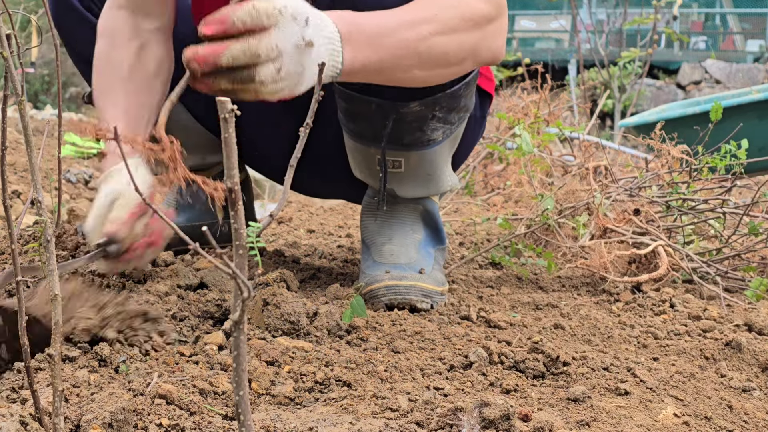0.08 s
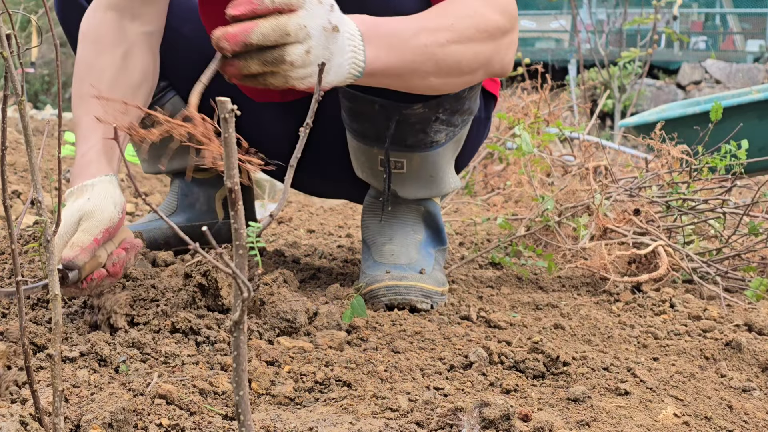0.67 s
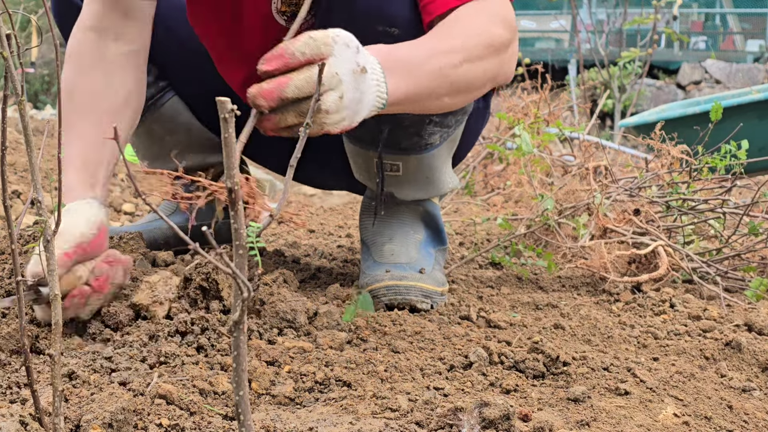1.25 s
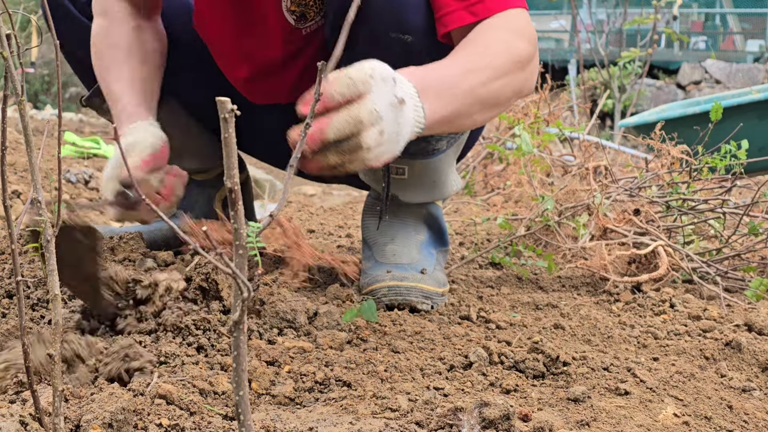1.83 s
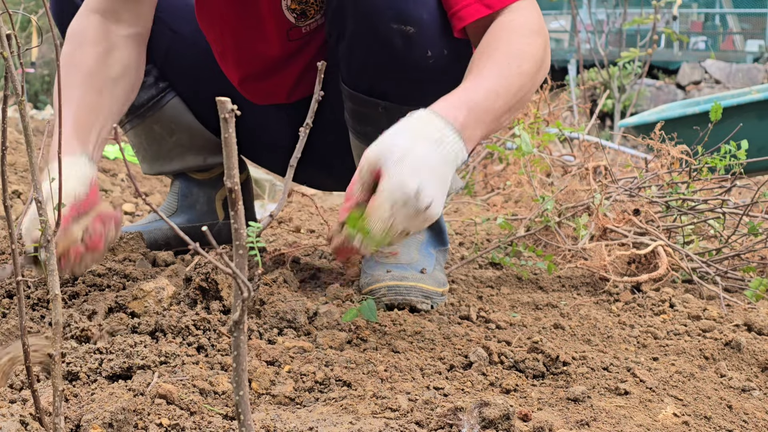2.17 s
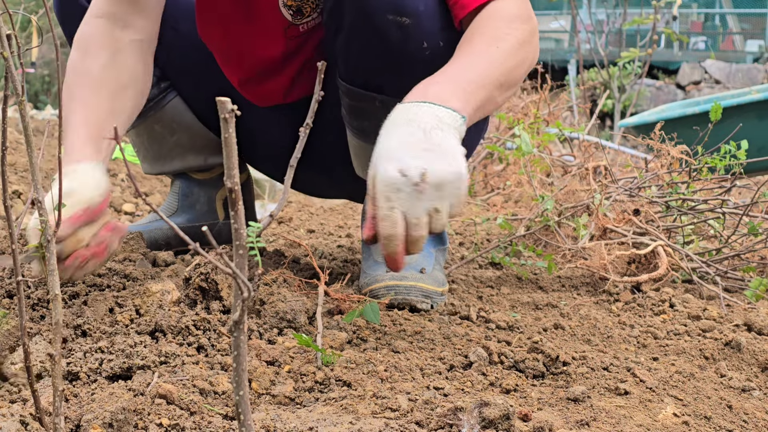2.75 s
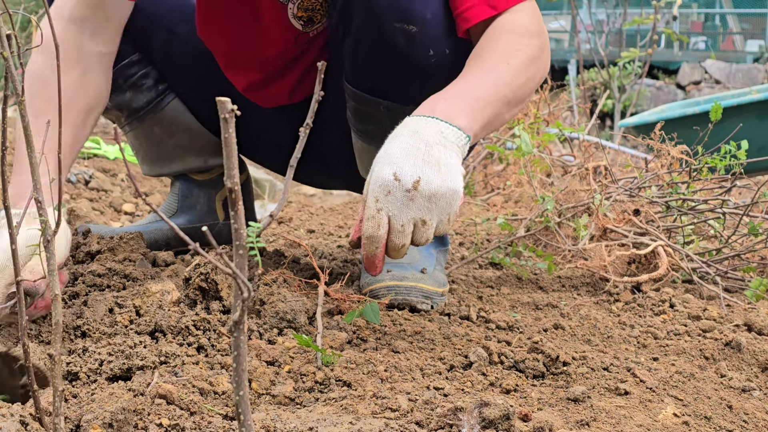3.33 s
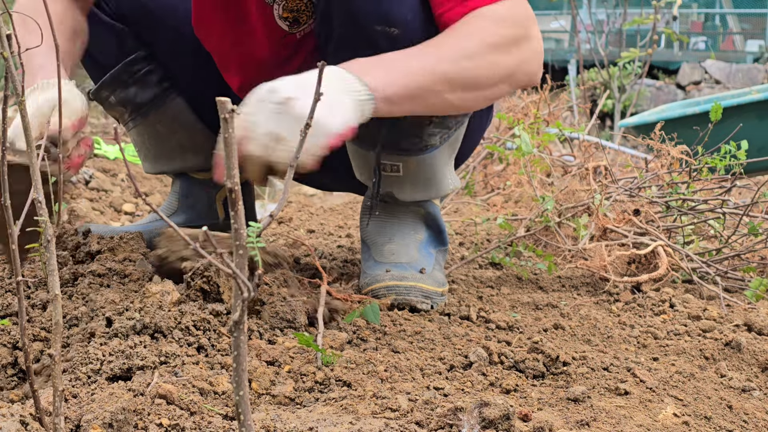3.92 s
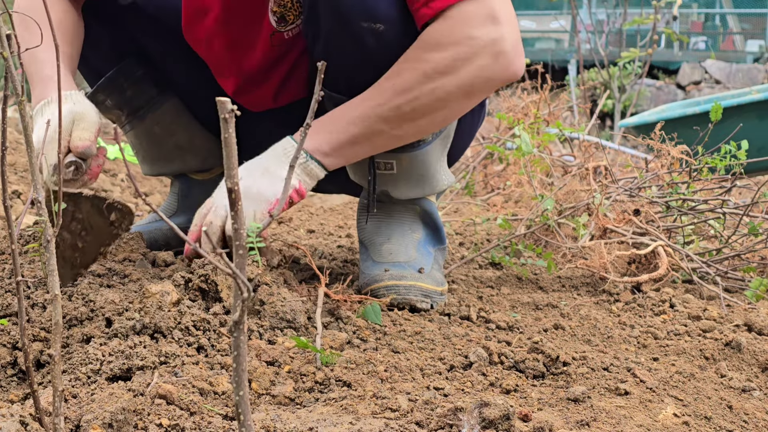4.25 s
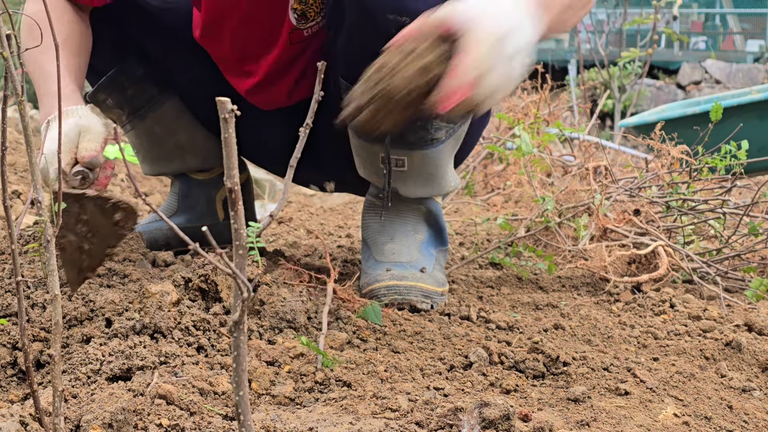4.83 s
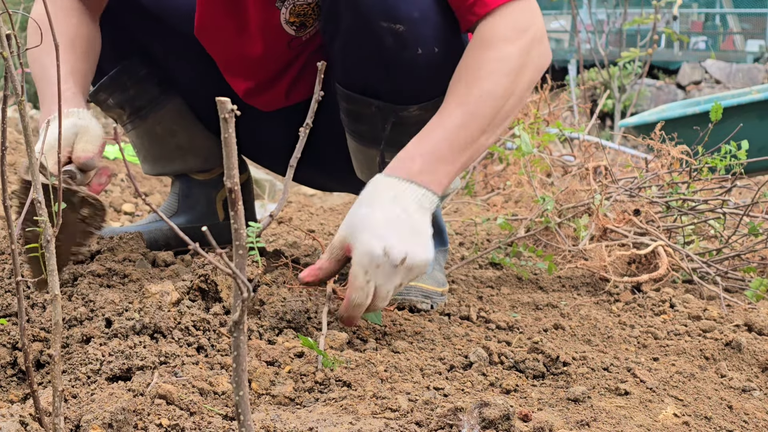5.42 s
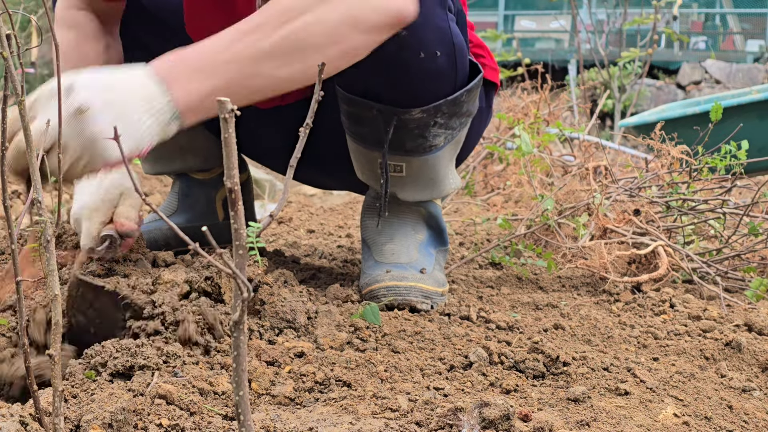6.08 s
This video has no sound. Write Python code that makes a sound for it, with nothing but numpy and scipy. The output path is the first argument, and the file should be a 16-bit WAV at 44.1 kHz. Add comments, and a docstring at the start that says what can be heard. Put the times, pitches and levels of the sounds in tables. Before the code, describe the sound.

In a garden, close and slightly left of the microphones, a small hand hoe chops into dry stony soil and drags through it. Each stroke crunches, with a very brief steel ring, and crumbs and pebbles trickle off. The strokes grow lighter and sparser. Distant traffic rumbles, a far bird whistles faintly and an engine's low drone grows. Near the end something hard knocks twice in quick succession on the right, then the hoe scrapes again.

```python
"""Distant traffic rumbles behind a garden as, close to the microphones, a small hand hoe chops into
dry stony soil and drags through it. Grains fracture under the blade, the steel rings briefly, and
crumbs and pebbles trickle off. A far bird whistles in thin glides and an engine's drone grows.
Late on, something hard knocks twice on the right, each blow a crack and a short damped ring."""
import sys
import numpy as np
from scipy import signal
from scipy.fft import rfft, irfft, next_fast_len
from scipy.io import wavfile
from scipy.ndimage import map_coordinates

SR = 44100
rng = np.random.default_rng(int(sys.argv[2]) if len(sys.argv) > 2 else 0)


def inscribe(sig):
    """Save sig as 16-bit PCM at rate SR to the path in sys.argv[1].

    A 1-D sig is mono; a 2-D sig holds one channel per row.
    Samples are clipped to [-1, 1] before scaling.
    """
    pcm = np.round(np.clip(np.atleast_2d(sig).T, -1, 1) * 32767)
    wavfile.write(sys.argv[1], SR, pcm.astype(np.int16))


N = 268877


def amp(db):
    """Decibels to gain."""
    return 10 ** (np.asarray(db) / 20)


def unit(x):
    """Scale to rms 1."""
    return x / np.sqrt(np.mean(x ** 2) + 1e-20)


def along(points, hz):
    """Read (frequency, value) points on a log frequency axis."""
    freqs, values = np.transpose(points)
    return np.interp(np.log(hz + 1), np.log(freqs + 1), values)


def curves(rows):
    """One value per sample for each column after the time."""
    times, *columns = np.transpose(rows)
    return [np.interp(np.arange(N) / SR, times, column) for column in columns]


def wobble(rate):
    """A smooth random curve, rate knots a second."""
    knots = rng.standard_normal(int(N * rate / SR) + 4)
    return map_coordinates(knots, [np.arange(N) * rate / SR])


def filtered(x, response):
    """Pass x through a complex response of frequency."""
    size = next_fast_len(N + 8192)
    return irfft(rfft(x, size) * response(np.fft.rfftfreq(size, 1 / SR)), size)[..., :N]


def coloured(x, gain_db, size=2048):
    """Causal filter with the gain gain_db(Hz), so that attacks stay sharp."""
    cepstrum = irfft(np.log(amp(gain_db(np.fft.rfftfreq(size, 1 / SR)))))
    cepstrum[1:size // 2] *= 2  # fold to minimum phase
    cepstrum[size // 2 + 1:] = 0
    return signal.fftconvolve(x, irfft(np.exp(rfft(cepstrum))))[:len(x)]


def add(track, s, sound):
    """Mix a sound into a track at time s."""
    part = track[round(s * SR):][:len(sound)]
    part += sound[:len(part)]


def grit(count, rate, spread_db):
    """Tiny fractures of uneven size at random moments, about rate a second, rms 1."""
    happens = rng.random(count) < rate / SR
    sizes = amp(spread_db * np.clip(rng.standard_normal(count), -2, 2))
    return unit(happens * sizes * rng.choice([-1, 1], count))


def lingering(power, t60):
    """Spread a power over a tail that falls 60 dB in t60 seconds."""
    keep = amp(-60 / (t60 * SR)) ** 2
    return signal.lfilter([1 - keep], [1, -keep], power)


# how alike far sound is at the two microphones: (frequency [Hz], coherence [0-1])
MIC_COHERENCE = [(60, 0.87), (200, 0.96), (400, 0.7), (800, .25), (1500, 0)]
def far_noise(spectrum):
    """Wide noise of rms 1, alike at both microphones only in the bass."""
    def response(hz):
        width = np.arccos(np.clip(along(MIC_COHERENCE, hz), -1, 1)) / 2
        return amp(along(spectrum, hz)) * [np.cos(width), np.sin(width)]
    mid, side = filtered(rng.standard_normal((2, N)), response)
    return unit(np.array([mid + side, mid - side]))


# spectra of the road's low rumble and tyre rush: (frequency [Hz], relative level [dB])
RUMBLE_SPECTRUM = [(20, -28.5), (33, -13.5), (45, -10), (80, 1.5), (129, -7.5), (190, -3.5), (238, -5),
                   (330, -16), (450, -18.5), (700, -57.5), (1000, -120)]
TYRE_SPECTRUM = [(30, -26), (150, -6), (350, -6), (900, 1.5), (1300, -4.5), (2200, -11.5), (3200, -23.5),
                 (4400, -28), (6000, -37.5), (10000, -44.5), (15000, -51.5)]
# the road from the garden: (time [s], relative rumble level [dB], relative tyre level [dB])
TRAFFIC_LEVELS = [(0.0, -49.5, -60), (0.22, -50.5, -59.5), (2.17, -50.5, -58), (2.99, -48.5, -56),
                  (6.1, -48, -56.5)]
def traffic():
    """Far behind the garden, traffic rumbles and tyres rush, both wavering a little."""
    rumble_db, rush_db = curves(TRAFFIC_LEVELS)
    rumble = amp(rumble_db + 1.5 + 1.3 * wobble(4.4)) * far_noise(RUMBLE_SPECTRUM)
    rush = amp(rush_db + 3 + 0.63 * wobble(3)) * far_noise(TYRE_SPECTRUM)
    return rumble + rush


# the drone of an engine drawing nearer: (time [s], level [dB])
ENGINE_LEVELS = [(0, -64.5), (2.45, -64.5), (3, -47.5), (3.45, -63.5), (4, -49), (4.3, -53.5),
                 (5.45, -38.5), (6.1, -39)]
def engine(firing_hz=56.36, overtone_db=-15):
    """One far engine, dead centre, drones unsteadily on its firing rate and two overtones."""
    drone_db, = curves(ENGINE_LEVELS)
    phase = 2 * np.pi * np.cumsum(firing_hz + 1.4 * wobble(6.4)) / SR
    overtones = amp(overtone_db) * (np.sin(2 * phase) + np.sin(3 * phase))
    return amp(drone_db + 1.6 * wobble(18)) * (np.sin(phase) + overtones)


# spectrum of fine crumbs at close range: (frequency [Hz], relative level [dB])
CRUMB_SPECTRUM = [(200, -25), (1500, -11), (3000, 0), (4600, -1.5), (7600, -6), (9100, -1.5), (11200, -10),
                  (14000, -8), (16000, -19)]
# loose soil slides off blade or glove, and dust settles after the knocks at 5.46 s: (start [s], length [s],
# relative level [dB], run-out t60 [s])
SOIL_SPILLS = [(0, 0.1, -61, 0.23), (0.071, .21, -54, 0.081), (0.953, 0.043, -48, 0.17),
               (1.375, 0.025, -60, 0.18), (1.757, 0.055, -61, 0.47), (2.851, 0.058, -59.5, 0.2),
               (3.429, 0.18, -58.5, .2), (3.749, 0.2, -73, 0.53), (4.717, 0.093, -71, .2),
               (5.463, 0.17, -71.5, 0.85), (5.849, 0.058, -57.5, 0.38), (6.013, .07, -57, .25)]
def crumbs(work, shed_db=-20, shed_t60=0.25, attack_s=0.01, settle_db=-12.5, settle_t60=1.28):
    """Fine soil is thrown up by the blade's work or slides off in spills, ticking on the ground."""
    now = np.arange(N) / SR
    flow = amp(shed_db) ** 2 * lingering(work ** 2, shed_t60)
    for s, length, db, t60 in SOIL_SPILLS:
        attack = 1 - np.exp(-np.maximum(now - s, 0) / attack_s)
        run_out = amp(db - 60 * np.maximum(now - s - length, 0) / t60)
        flow += (attack * run_out) ** 2
    flow += amp(settle_db) ** 2 * lingering(flow, settle_t60)  # the last crumbs roll on
    dust, ticks = grit(N, rate=2700, spread_db=1.5), grit(N, rate=170, spread_db=5)
    clumping = amp(2 * wobble(130))
    grains = np.sqrt(flow) * clumping * (0.78 * dust + 0.36 * ticks)
    return coloured(grains, lambda hz: along(CRUMB_SPECTRUM, hz))


# the duller spectrum of soil pushed along by the blade: (frequency [Hz], relative level [dB])
DRAG_SPECTRUM = [(60, -17.5), (450, -6.5), (950, 5.5), (1400, 3), (2050, 7.5), (2400, 0.5), (2800, 3),
                 (4000, -5.5), (4600, -3), (7500, -14), (9400, -11.5), (15500, -24.5)]
# pulls through the soil: (time of hardest pull [s], relative level [dB], build-up [s], let-go [s])
HOE_PULLS = [(.13, -32, 0.092, 0.053), (.665, -45.5, 0.029, 0.028), (.75, -42, 0.074, 0.02),
             (.92, -28, 0.037, 0.032), (.972, -34.5, .015, 0.032), (1.359, -40, .013, 0.02),
             (2.322, -41, 0.031, 0.039), (3.605, -37, 0.14, .075), (5.988, -45, 0.034, 0.017),
             (6.05, -46.5, 0.042, 0.029)]
def drag(swell_db=20.5):
    """Each pull swells and lets go; the blade sticks and slips through sand and catches on gravel."""
    now = np.arange(N) / SR
    effort = sum(amp(db - swell_db * np.maximum((s - now) / build, (now - s) / release))
                 for s, db, build, release in HOE_PULLS)
    sand, gravel = grit(N, rate=2400, spread_db=3), grit(N, rate=220, spread_db=7)
    stick_slip = amp(1.5 * wobble(170))
    grains = effort * stick_slip * 0.7 * (sand + gravel)
    return coloured(grains, lambda hz: along(DRAG_SPECTRUM, hz))


# single pebbles land near the microphones: (time [s], relative level [dB])
PEBBLE_LANDINGS = [(0.054, -41), (0.2318, -33.5), (1.0779, -42), (1.1124, -47), (1.477, -44.5),
                   (1.723, -45.5), (2.9537, -47), (3.049, -56), (3.7785, -43.5), (3.8244, -49.5),
                   (3.932, -51), (4.012, -55), (4.2208, -56)]
def pebbles(gain_db=-8, t60=0.019):
    """Each pebble lands with a tiny gritty tick, coloured like the crumbs."""
    track, t = np.zeros(N), np.arange(SR // 20) / SR
    for s, db in PEBBLE_LANDINGS:
        add(track, s, amp(db + gain_db - 60 * t / t60) * grit(len(t), rate=14000, spread_db=3))
    return coloured(track, lambda hz: along(CRUMB_SPECTRUM, hz))


# spectrum of crushed soil at close range: (frequency [Hz], relative level [dB])
CRUSH_SPECTRUM = [(40, -22.5), (130, -2), (300, -6.5), (500, -2.5), (1400, 3), (1800, -3), (2350, 3.5),
                  (2750, 2), (3500, -1), (4500, -0.5), (6000, -8.5), (7700, -9), (9200, -2.5), (10200, -12),
                  (11200, -16.5), (13500, -11), (15500, -24)]
# the blade bites clods and stones:
# (time [s], relative level [dB], nominal crushing time [s], thud [dB], brightness [dB])
HOE_BITES = [(0.112, -16, .003, -18, -6), (0.1302, -16, 0.0015, -3.5, -1),
             (0.1464, -12, 0.0044, -2.5, -2.5), (0.164, -38.5, 0.0056, 17.5, 8),
             (0.609, -36.5, 0.022, 2, 4.5), (0.7015, -36.5, 0.0025, 1, 2), (0.724, -29, 0.0039, -3.5, -3),
             (0.74, -42, 0.0044, -6, 1), (0.76, -35.5, .0037, 7.5, -1), (0.881, -26, 0.0088, 4.5, 0),
             (0.906, -29, .013, 1, 2), (0.932, -28.5, 0.0081, 10.5, 3), (0.942, -25.5, 0.0013, -3, 11.5),
             (0.9717, -23.5, 0.0028, -2.5, -2), (0.98, -29, 0.0038, -6, 1.5), (1.344, -22.5, .01, 8.5, 0),
             (1.396, -43.5, 0.0064, 6, -4), (1.792, -38.5, 0.0029, -4, 12), (1.8235, -51.5, .003, -11, 7),
             (2.1677, -32.5, 0.0286, 6, 8), (2.2579, -38, 0.0066, 4, 3), (2.303, -39.5, 0.0072, 1, 2),
             (2.324, -32, 0.013, 2, 0.5), (2.3982, -26.5, 0.0045, -4, 6.5),
             (2.706, -31.5, 0.0046, 7.5, 2.5), (2.728, -43, 0.0018, 15.5, 10),
             (2.751, -30.5, 0.0013, 11.5, -17.5), (3.373, -42, 0.0046, -1, 7), (3.384, -42.5, 0.013, -7, 8),
             (5.8063, -34, 0.0048, 9, 7.5)]
def bites(rise_s=0.0004, t60=0.016, crack=9.7, thud_hz=950, bright_hz=6000,
          graze_s=0.00098, graze_db=-15, clod_hz=475, clod_t60=0.028, clod_db=-12):
    """Each bite grazes, cracks and briefly crushes grains; deep bites thud, stones sound bright."""
    track, t = np.zeros(N), np.arange(-SR // 100, SR // 10) / SR
    graze = amp(graze_db) * np.exp(-np.abs(t) / graze_s)
    attack = 1 - np.exp(-np.maximum(t, 0) / rise_s)
    for s, db, crush_s, thud_db, bright_db in HOE_BITES:
        def tone_db(hz):
            low_shelf = thud_db / (1 + (hz / thud_hz) ** 4)
            high_shelf = bright_db * (1 - 1 / (1 + (hz / bright_hz) ** 6))
            return along(CRUSH_SPECTRUM, hz) + low_shelf + high_shelf
        force = attack * amp(-60 * np.maximum(t - 0.82 * crush_s, 0) / t60)
        grains = (graze + force) * grit(len(t), rate=7700, spread_db=2.5)
        grains[np.searchsorted(t, rise_s)] += crack * rng.choice([-1, 1])
        since_stop = np.maximum(t - crush_s / 2, 0)  # halfway in, packed earth stops the blade
        clod_phase = 2 * np.pi * clod_hz * rng.uniform(0.895, 1.08) * since_stop
        clod = amp(clod_db + thud_db - 60 * since_stop / clod_t60) * np.sin(clod_phase)
        add(track, s + t[0], amp(db) * (coloured(grains, tone_db) + clod))
    return track


# modes of the steel blade, damped by the earth: (frequency [Hz], gain [dB], t60 [s])
BLADE_MODES = [(2304, -6.5, 0.073), (4400, -5, 0.028), (5500, -4.5, 0.036), (9230, -3, .06),
               (10100, -8.5, 0.046)]
def blade(contact):
    """The contact sound, plus the short ring that it starts in the steel."""
    def resonance(f, hz, t60):
        width_hz = np.log(1000) / (np.pi * t60)
        damping = 1j * f * width_hz
        return damping / (hz * hz - f * f + damping)
    ring = lambda f: sum(amp(db) * resonance(f, hz, t60) for hz, db, t60 in BLADE_MODES)
    return filtered(contact, lambda f: 1 + ring(f))


# a far bird's glides: (start [s], length [s], first pitch [Hz], last pitch [Hz], level [dB])
BIRD_WHISTLES = [(1.167, 0.044, 5270, 4730, -68), (1.207, .09, 4770, 4080, -71.5),
                 (2.522, 0.18, 4390, 4380, -74.5), (3.117, .16, 4300, 4230, -87),
                 (4.555, 0.27, 4060, 4530, -76), (4.839, 0.04, 5010, 5080, -74),
                 (4.876, .048, 5520, 4250, -71), (4.909, .09, 4370, 4150, -70),
                 (5.26, .08, 4800, 4150, -74)]
def bird(echo_t60=0.87, waver_hz=70, flutter_db=1.5):
    """Thin whistles swell, glide and fade, blurred by the distance to the microphones."""
    song, now = np.zeros(N), np.arange(N) / SR
    waver, flutter = waver_hz * wobble(90), flutter_db * wobble(70)
    for s, length, first_hz, last_hz, db in BIRD_WHISTLES:
        progress = np.clip((now - s) / length, 0, 1)
        pitch = first_hz + (last_hz - first_hz) * progress + waver
        swell = 4 * progress * (1 - progress)
        song += amp(db + flutter) * swell * np.sin(2 * np.pi * np.cumsum(pitch) / SR)
    t = np.arange(SR // 2) / SR
    tail = rng.standard_normal((2, len(t))) * amp(-60 * t / echo_t60)
    echo = signal.fftconvolve(song[None], tail / np.linalg.norm(tail[0]), axes=1)[:, :N]
    return song + echo


# modes of the hard thing knocked: (frequency [Hz], relative level [dB], t60 [s])
STRUCK_MODES = [(147, -27, 0.056), (705, -15.5, 0.014), (1056, -7, 0.0077), (1256, -10, 0.019),
                (1470, -19, 0.039), (2090, 3, 0.0063), (2640, -29, 0.0088), (4010, -19, 0.013)]
# spectrum of a knock's crack: (frequency [Hz], relative level [dB])
CRACK_SPECTRUM = [(300, 8.5), (3000, 11.5), (4500, 6.5), (6000, -5.5), (8000, -8), (9500, 0.5), (12500, -1),
                  (15500, -1)]
# two dry knocks nearby, two faint after-knocks: (time [s], relative level [dB], contact cut-off [Hz])
KNOCK_BLOWS = [(5.4222, -2.5, 4420), (5.446, 4, 1010), (5.498, -29, 2600), (5.5596, -19.5, 1180)]
def knocks(rise_s=0.0003, crack_db=-18, crack_t60=0.0071, dust_db=-43, dust_t60=0.16):
    """Every blow cracks and rings the same damped modes; a softer contact leaves out the high ones."""
    track, t = np.zeros(N), np.arange(SR // 8) / SR
    attack = 1 - np.exp(-t / rise_s)
    force = amp(crack_db - 60 * t / crack_t60) + amp(dust_db - 60 * t / dust_t60)
    for s, db, contact_hz in KNOCK_BLOWS:
        ring = np.zeros(len(t))
        for hz, mode_db, t60 in STRUCK_MODES:
            roll_off = np.hypot(1, (hz / contact_hz) ** 3)
            ring += amp(mode_db - 60 * t / t60) * np.sin(2 * np.pi * hz * t) / roll_off
        crack = coloured(force * rng.standard_normal(len(t)), lambda hz: along(CRACK_SPECTRUM, hz))
        hardness = contact_hz / 4500
        add(track, s, amp(db) * attack * (ring + hardness * crack))
    return track


def placed(x, left_lag_ms, pan_db, scatter_db, scatter_t60):
    """A near source reaches the two microphones at different times; ground and body scatter it."""
    delay_s = left_lag_ms / 1000 * np.array([[0.5], [-0.5]])
    direct = filtered(x, lambda hz: np.exp(-2j * np.pi * hz * delay_s))
    scatter, step = np.zeros((2, N)), SR // 20
    t = np.arange(step) / SR
    for start in range(0, N, step):  # the paths change as the gardener moves
        paths = rng.standard_normal((2, step)) * amp(-60 * t / scatter_t60)
        paths /= np.linalg.norm(paths[0])
        echo = signal.fftconvolve(x[None, start:start + step], paths, axes=1)
        for side in range(2):
            add(scatter[side], start / SR, echo[side])
    low_cut = signal.butter(1, 600, "high", fs=SR, output="sos")  # long waves pass small things by
    scatter = signal.sosfilt(low_cut, scatter)
    return (direct + amp(scatter_db) * scatter) * amp([[pan_db / 2], [-pan_db / 2]])


def scene():
    """From the microphones: the hoe close and a little left, the knocks right, the town all around."""
    work = bites() + drag()
    debris = crumbs(work) + pebbles()
    hoe = placed(blade(work), left_lag_ms=-0.19, pan_db=2.5, scatter_db=-2, scatter_t60=0.022)
    trickle = placed(blade(debris), left_lag_ms=-0.17, pan_db=1, scatter_db=8.5, scatter_t60=0.013)
    knock = placed(knocks(), left_lag_ms=0.367, pan_db=-3.5, scatter_db=-8.5, scatter_t60=0.019)
    return hoe + trickle + knock + engine() + traffic() + bird()


def record(dry, top_hz=15700):
    """The microphones' signal is cut off steeply above its band limit."""
    return filtered(dry, lambda hz: 1 / np.hypot(1, (hz / top_hz) ** 100))


dry = scene()
out = record(dry)
inscribe(out)
```